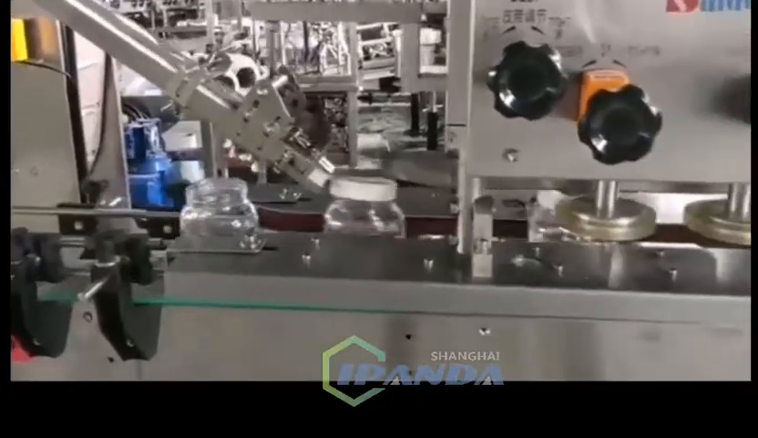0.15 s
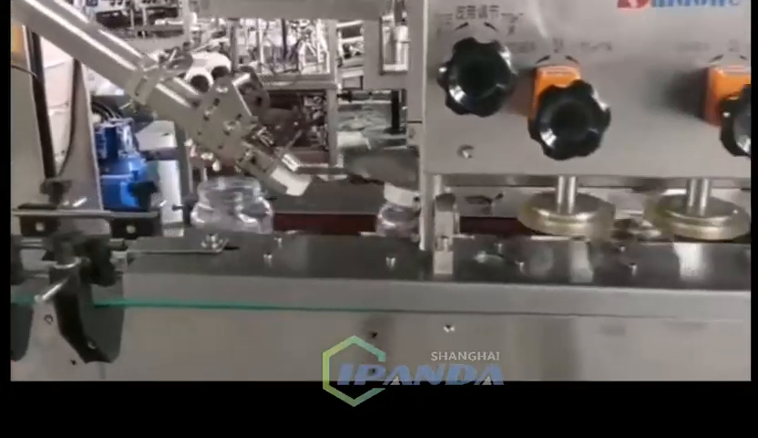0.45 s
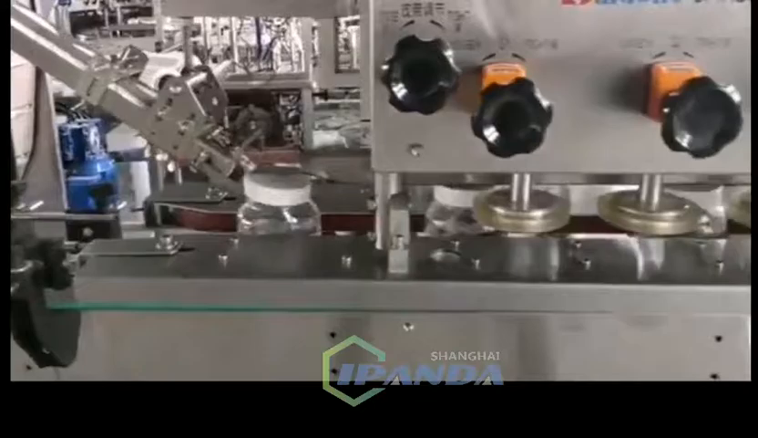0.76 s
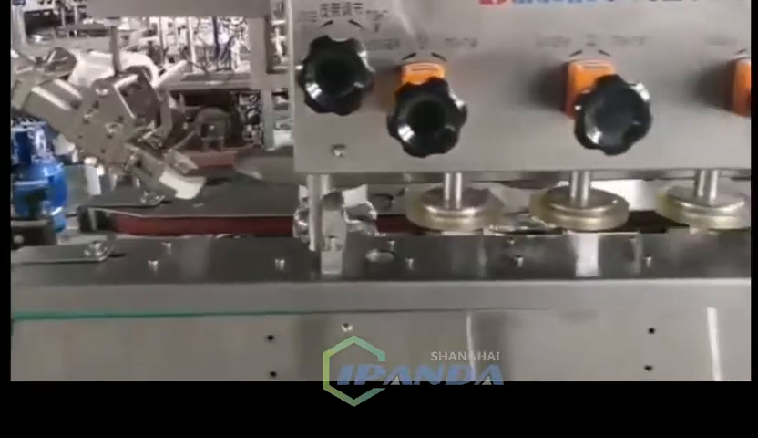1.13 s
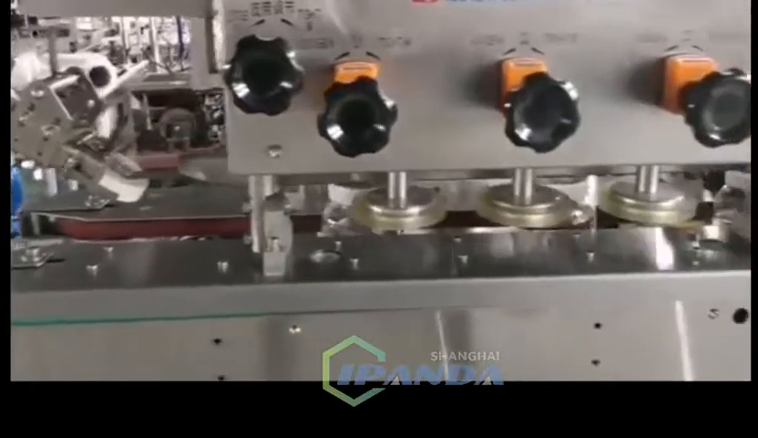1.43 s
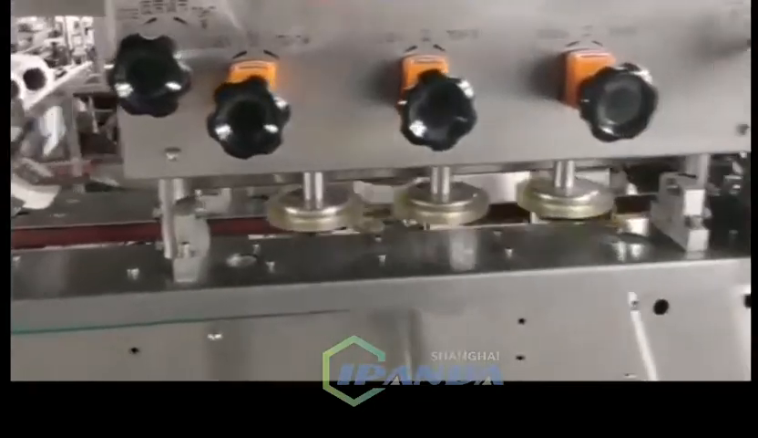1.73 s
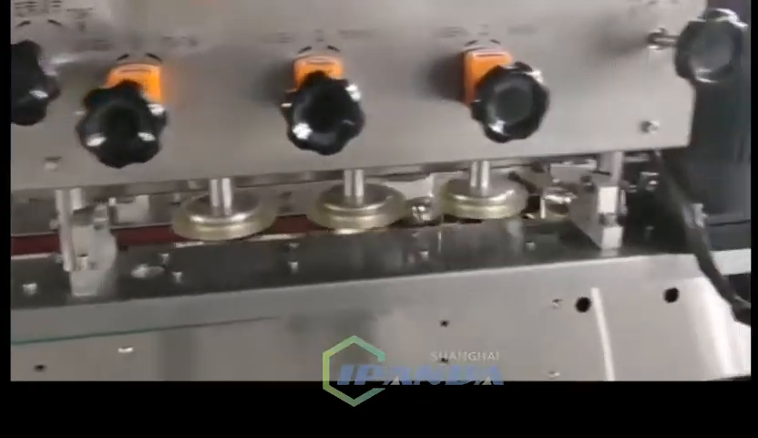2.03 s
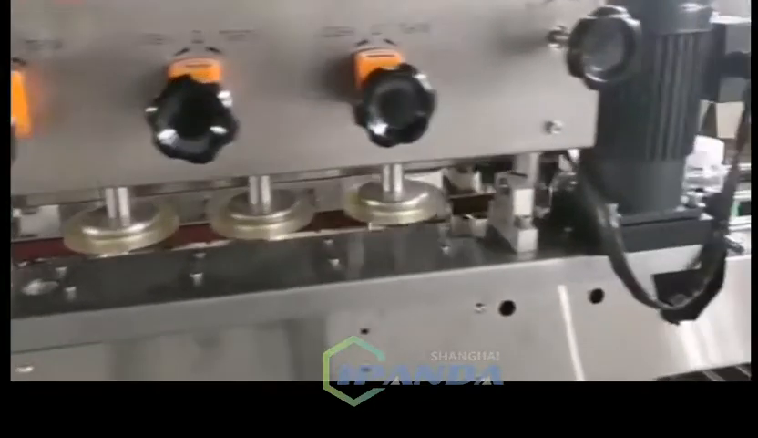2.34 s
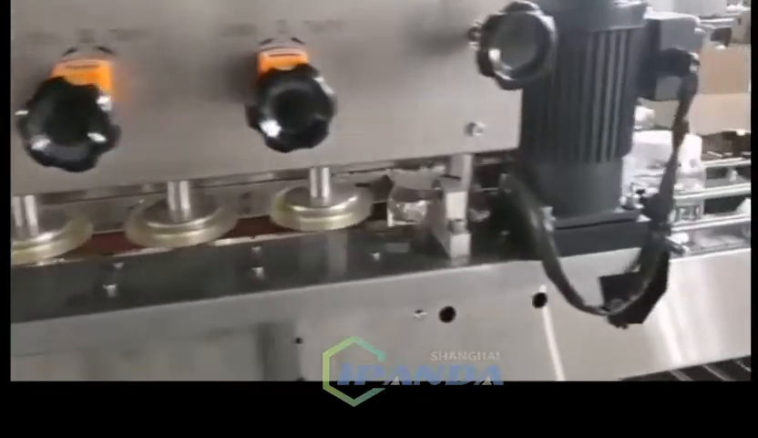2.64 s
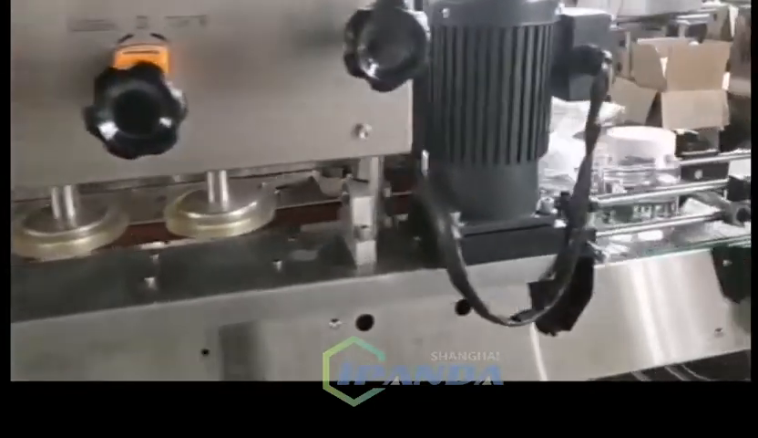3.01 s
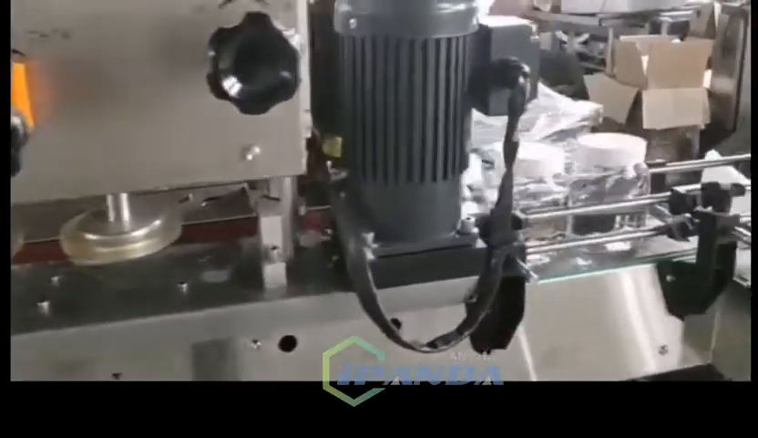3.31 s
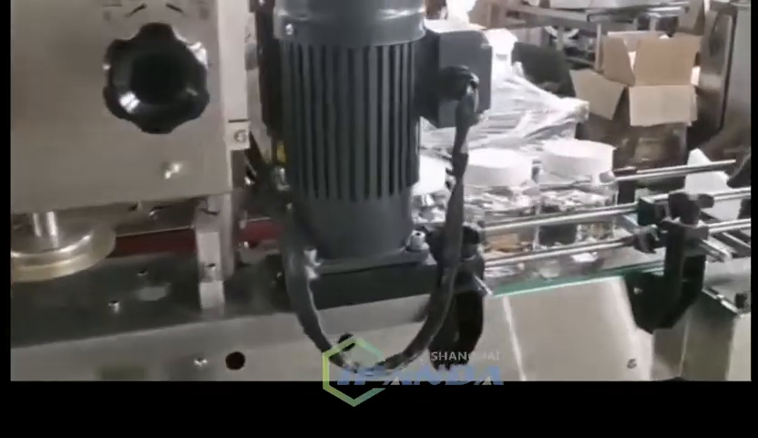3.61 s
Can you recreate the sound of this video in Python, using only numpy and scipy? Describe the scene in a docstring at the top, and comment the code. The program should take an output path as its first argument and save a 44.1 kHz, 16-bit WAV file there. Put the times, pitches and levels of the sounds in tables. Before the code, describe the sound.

Steady whirring and humming comes from a nearby jar capping line in a slightly echoing factory. Quick lid clacks come first, then scattered knocks, a louder clack with a brief metallic ring, and finally a few jar clinks.

```python
"""A capping line runs in a factory hall, heard through a phone that walks along it. Belts and fans whir
as broadband noise, and the meshing teeth of two gearboxes whine in turn. Caps clack onto jars in bursts
of tiny contacts. Blows excite damped modes: lids knock, a guide rail and a steel bar ring, the frame
thuds and full jars clink. The hall answers each blow with diffuse reverberation."""
import sys
import numpy as np
from scipy import signal
from scipy.fft import rfft, irfft, next_fast_len
from scipy.io import wavfile
from scipy.ndimage import uniform_filter1d

SR = 44100
rng = np.random.default_rng(int(sys.argv[2]) if len(sys.argv) > 2 else 0)


def master_out(mix):
    """Clip the mix to full scale and print it as 16-bit PCM to the path in sys.argv[1]."""
    frames = np.transpose(np.atleast_2d(mix))
    ceiling = np.clip(frames, -1, 1)
    pcm = np.round(ceiling * 32767).astype(np.int16)
    wavfile.write(sys.argv[1], SR, pcm)


N = 165816
HARD_CONTACT_S, MEDIUM_CONTACT_S, SOFT_CONTACT_S = 0.00085, 0.005, 0.011


def amp(db):
    """Decibels to amplitude ratio."""
    return 10 ** (np.asarray(db) / 20)


def unit(x):
    """Normalisation to rms 1."""
    return x / np.sqrt(np.mean(x ** 2))


def on_hz(table, size):
    """Interpolation of (Hz, value) rows over log frequency, at the bins of a spectrum."""
    hz, value = np.array(table, float).T
    return np.interp(np.log(np.fft.rfftfreq(size, 1 / SR) + 1), np.log(hz), value)


def on_time(table):
    """Interpolation of (seconds, values..) rows: one curve for each value column."""
    times, *columns = np.array(table).T
    return [np.interp(np.arange(N) / SR, times, column) for column in columns]


def wander(rate_hz, size):
    """Random modulation of rms 1: Gaussian values joined by ramps."""
    step = max(int(SR / rate_hz), 2)
    held = np.repeat(rng.standard_normal(size // step + 1), step)
    return unit(uniform_filter1d(held, step)[:size])


def add(out, x, start_s):
    """Superposition of x on out from start_s."""
    i = int(start_s * SR)
    out[i:i + len(x)] += x[:N - i]


def whir():
    """Broadband noise of belts and fans: two incoherent signals whose third-octave bands flicker."""
    # Each row: frequency in Hz, relative spectral density in dB.
    spectrum = [(28, -20), (50, -8.5), (200, -6.5), (300, -11), (550, -10), (800, -10.5), (1200, -12.5),
                (2700, -10.5), (4500, -15.5), (6500, -12.5), (7700, -19)]
    # Each row: time in seconds, level in dB, middle and bass against the treble in dB.
    levels = [(0, -38.5, 0.1, -1), (.3, -36, 0, 1), (1.1, -35, 0.83, 0.51), (2.0, -35, 0, -0.73),
              (2.75, -34, 1, -1.8), (3.1, -35.5, 0, -1.5), (3.76, -34, 0, -1.7)]
    level_db, middle_db, bass_db = on_time(levels)
    size = next_fast_len(N)
    octave = np.log2(np.fft.rfftfreq(size, 1 / SR) + 1)
    ripple_db = 2.5 * wander(SR / 90, len(octave)) * (octave > np.log2(900))  # uneven above 900 Hz
    gritty = rng.standard_normal((2, size)) * amp(wander(300, size))
    noise = rfft(gritty) * amp(on_hz(spectrum, size) + ripple_db)
    out = np.zeros((2, N))
    for centre in np.arange(4, 13.4, 1 / 3):  # octaves above 1 Hz
        band = np.cos(np.pi * np.clip(1.5 * (octave - centre), -.5, .5)) ** 2
        band_db = bass_db if centre < 8.7 else middle_db if centre < 11.6 else 0
        flicker_db = 1.3 * wander(14, N)
        out += irfft(noise * band, size)[:, :N] * amp(band_db + flicker_db)
    swell_db = .4 * wander(6.6, N)
    return unit(out) * amp(level_db + swell_db)


def gearboxes():
    """Tooth-mesh tones of two gearboxes, each broadened into a narrow band by random modulation."""
    # Each row: frequency in Hz, width in Hz, relative level in dB, roughness from 0 to 1.
    first, second = [(499, 22, 0, .4), (1008, 35, -12, .9), (3192, 20, -12, .8)], [(670, 30, 0.85, 0.92), (699, 30, -0.75, 0.82)]
    # The walk past them. Each row: time in seconds, first and second gearbox's level in dB.
    passing = [(0, -41.5, -78), (.7, -37.5, -59), (1.4, -41, -68), (2.1, -51, -59.5), (2.6, -47, -49.5),
               (3.76, -62, -50)]
    out, t = np.zeros(N), np.arange(N) / SR
    for tones, level_db in zip((first, second), on_time(passing)):
        for hz, width_hz, tone_db, rough in tones:
            smear = (wander(width_hz, N) + 1j * wander(width_hz, N)) / np.sqrt(2)
            tone = np.imag((1 - rough + rough * smear) * np.exp(2j * np.pi * hz * t))
            out += amp(level_db + tone_db) * np.sqrt(2) * tone
    return out


def clacks():
    """Impact noise of caps on jars: many tiny contacts merge into a burst with one spectral hump."""
    # Each row: start in seconds, level in dB, centre in Hz, width in octaves,
    # then rise, hold and 60 dB decay time in seconds.
    bursts = [(0.145, -26.5, 4820, 1.3, 0.004, 0.014, 0.12), (0.182, -29, 3540, 3.6, .003, 0.054, 0.45),
              (0.212, -19.5, 6600, 0.33, 0.0087, 0.02, 0.051), (0.293, -26.5, 4030, 3.6, 0.006, 0.039, 0.1),
              (0.655, -24.5, 3970, 0.31, 0.0087, 0.042, 0.14),
              (0.709, -21.5, 3570, 6.9, 0.01, 0.017, 0.066),
              (0.792, -18.5, 4730, 1.3, 0.0033, 0.0053, 0.068), (0.8, -21.5, 4480, 1.6, .002, .02, .12),
              (0.852, -17.5, 6530, 1.4, 0.003, 0.023, 0.043),
              (1.024, -32.5, 3780, 0.87, 0.01, 0.031, 0.085), (1.362, -26, 3400, 4.2, 0.0083, 0.016, 0.055),
              (1.708, -23, 4060, 5.8, 0.0086, 0.024, 0.14), (2.3781, -10, 4500, 2.6, 0.00026, .0012, 0.014),
              (2.381, -18.5, 3940, 7.9, 0.0022, 0.008, 0.14),
              (2.425, -17.5, 2940, 1.24, 0.0063, 0.028, 0.1), (3.287, -21, 5970, 1, 0.0062, 0.025, 0.041),
              (3.307, -23.5, 4320, 0.77, 0.0023, 0.021, 0.1), (3.413, -17, 3680, 1.2, 0.0014, 0.02, 0.035),
              (3.539, -29, 3480, 0.83, 0.0037, 0.0069, 0.17),
              (3.602, -33.5, 5000, 5.8, 0.0016, 0.0081, 0.049)]
    out, size = np.zeros(N), 16384
    t = np.arange(size) / SR
    octave = np.log2(np.fft.rfftfreq(size, 1 / SR) + 1)
    skirt = 0.22 * (octave > 8)  # flat floor above the bass
    for start_s, db, hz, width, rise, hold, t60 in bursts:
        rattle = rng.standard_normal(size) * amp(3 * wander(400, size))
        hump = 1 / (1 + (2 * (octave - np.log2(hz)) / width) ** 2)
        patchy_db = 3.5 * wander(SR / 60, len(octave))
        burst = unit(irfft(rfft(rattle) * (skirt + hump) * amp(patchy_db)))
        attack = np.minimum(t / rise, 1) ** 2
        decay_db = -60 * np.maximum(t - rise - hold, 0) / t60
        add(out, burst * attack * amp(db + decay_db), start_s)
    return out


def ring(modes, hits, contact_s, free_s=np.inf):
    """Modal superposition: each blow excites decaying sines; after free_s the belts grip and damp them."""
    # Each row of modes: frequency in Hz, relative level in dB, 60 dB decay time in seconds.
    # Each row of hits: start in seconds, level in dB, decay time ratio, optional pitch ratio.
    hz, mode_db, t60 = np.array(modes).T[:, :, None]
    out, t = np.zeros(N), np.arange(SR // 2) / SR
    attack = np.minimum(t / contact_s, 1)
    grip_db = -60 * np.maximum(t - free_s, 0) / .1
    for start_s, db, decay_ratio, *pitch in hits:
        detune, phase, mix = rng.standard_normal((3, len(modes), 1))
        waves = np.sin(2 * np.pi * (hz * np.prod(pitch) * (1 + .001 * detune) * t + phase))
        wobble_db = 2 * np.array([wander(45, len(t)) for _ in modes]) * (hz > 1000)
        decay_db = grip_db - 60 * t / (t60 * decay_ratio)
        waves *= amp(mode_db + 1.5 * mix + wobble_db + decay_db)
        add(out, amp(db) * waves.sum(axis=0) * attack, start_s)
    return out


def lids():
    """Heavily damped midrange modes make a struck lid knock."""
    modes, hits = [(578, -1.5, .11), (640, -2.5, .13), (700, -4.5, .13), (503, -7, .09), (431, -8, .09)], [(.177, -26, 0.75, 1.04), (.195, -29.5, 1.1, 1.01), (.756, -27, 0.7, 1.08),
                                (.79, -25, 1.2, 1.03), (.843, -30, 0.37, 1.1), (1.03, -34, 1.5, 1.1),
                                (1.377, -38, 0.95, 1), (2.380, -22.5, 0.77, 0.87), (2.437, -20, 0.87, 1.15),
                                (3.414, -26, 0.64, 1.7)]  # rows as in ring()
    return ring(modes, hits, HARD_CONTACT_S)


def guide_rail():
    """Closely spaced high modes give the struck rail a brief metallic ring."""
    modes, hits = [(3826, 6, .15), (3590, -3, .1), (4075, -6, .12), (5865, -6, .16), (3080, -8, .2),
                   (4530, -8, .1), (3380, -6, .12)], [(0.304, -20, 0.45), (0.672, -23, 0.5), (1.032, -29, 0.63),
                                 (1.631, -27.5, 1.02), (2.439, -23.5, 1.27)]  # rows as in ring()
    return ring(modes, hits, MEDIUM_CONTACT_S)


def frame():
    """Low modes, excited through a soft contact, make the frame thud."""
    modes, hits = [(199.7, 2.5, 0.36), (224.7, 2, 0.28), (168.5, -7.5, 0.21), (310, -6, 0.32),
                   (432, -2, 0.17)], [(0.32, -38, 0.89, 0.97), (.679, -31, 1.13, 1.02),
                                  (0.727, -26.5, 0.95, 1.05), (0.822, -35.5, 0.65, .99),
                                  (1.032, -33.5, 0.63, 0.89), (1.384, -36.5, 0.73, 0.93),
                                  (1.647, -39.5, 0.63, 1.1), (1.692, -33, 0.69, 1.02),
                                  (1.771, -34.5, 0.51, 1.25), (2.058, -33.5, 0.59, 1.07),
                                  (2.37, -34.5, 1.14, 0.96), (2.446, -26.5, 0.65, 1.06),
                                  (2.495, -30, 0.68, 1)]  # rows as in ring()
    return ring(modes, hits, SOFT_CONTACT_S)


def steel_bar():
    """Two neighbouring modes of the struck bar beat until the belts damp them."""
    modes, hits = [(2378, 0, .8), (2410, -3, .8), (1908, 2, .13)], [(.716, -33, .2, 1.02), (1.372, -32, .2, 1.045), (2.383, -24, 1., 1.),
                                (2.437, -29, .8, 1.)]  # rows as in ring()
    return ring(modes, hits, HARD_CONTACT_S, free_s=.21)


def jars():
    """Wall modes of full jars clink: a lower jar decays freely, a higher one is damped by the belts."""
    low_modes, low_hits = [(2888, 1, .3), (2945, -4, .25), (4264, 2, .14), (3680, 0, .08), (5830, -4, .2),
                           (6735, -7, .08)], [(3.204, -36, .8), (3.24, -38, .6), (3.413, -23, .7),
                                            (3.458, -29, .9), (3.548, -32, .7), (3.608, -32, .7)]  # rows as in ring()
    high_modes, high_hits = [(3074, -2, .7), (4021, -6, .5), (4180, -8, .15), (4410, 0, .14),
                             (4570, -8, .1), (5916, 5, .22), (5730, 1, .08), (6100, -2, .08),
                             (2498, -7, .1)], [(3.293, -19, .4, .98), (3.309, -21.5, 1, 1)]
    low = ring(low_modes, low_hits, HARD_CONTACT_S)
    return low + ring(high_modes, high_hits, MEDIUM_CONTACT_S, free_s=.065)


def hall(x, db=-11, t60=0.85, top_hz=3900):
    """Diffuse reverberation: convolution with an exponentially decaying cloud of reflections."""
    t = np.arange(int(t60 * SR)) / SR
    cloud = signal.lfilter(*signal.butter(1, top_hz, fs=SR), rng.standard_normal(len(t)))
    cloud *= amp(-60 * t / t60)
    return amp(db) * signal.fftconvolve(x, cloud / np.linalg.norm(cloud))[:N]


def scatter(x):
    """All-pass dispersion: random group delays of a few milliseconds shift phase and keep colour."""
    size = next_fast_len(N)
    delay_s = .004 * np.abs(wander(SR / 400, size // 2 + 1))
    phase = 2 * np.pi * np.cumsum(delay_s) * SR / size
    return irfft(rfft(x, size) * np.exp(-1j * phase), size)[:N]


def ports(first, second, gain_db=-1.5):
    """Partial coherence: bass is nearly alike in both microphone ports;
    higher up, the right is later, dimmer and less alike."""
    # Each row: frequency in Hz, likeness of the ports from 0 to 1.
    likeness = [(60, .98), (300, .96), (600, .86), (1100, .5), (2200, .2)]
    # Each row: frequency in Hz, left minus right level in dB.
    balance = [(60, .4), (600, 0.58), (1580, 3), (2730, 5.7), (4710, 11.5), (8130, 16.5)]
    # Each row: frequency in Hz, phase lead of the left port in radians.
    phase_lead = [(220, 0), (520, .5), (700, .85), (1380, 3.2), (8000, 14)]
    size = next_fast_len(N)
    coherence = np.clip(on_hz(likeness, size), 0, 1)
    tilt = amp(on_hz(balance, size))
    lag = np.exp(-1j * on_hz(phase_lead, size))
    left, unrelated = rfft(first, size), rfft(second, size)
    right = (coherence * lag * left + np.sqrt(1 - coherence ** 2) * unrelated) / tilt
    equal_power = 2 / np.sqrt(1 + tilt ** -2.)
    return irfft(np.array([left, right]) * equal_power * amp(gain_db), size)[:, :N]


def scene():
    """Direct sound, reverberation of the blows and whir superpose at the phone's two ports."""
    blows = clacks() + lids() + guide_rail() + frame() + steel_bar() + jars()
    direct = blows + gearboxes()
    noise = whir()
    return ports(direct + hall(blows) + noise[0], scatter(direct) + hall(blows) + noise[1])


def record(dry, top_hz=7720):
    """Soft limiting rounds the loudest peaks, and a steep low-pass cuts the top."""
    low_pass = signal.ellip(12, .1, 60, top_hz, fs=SR, output="sos")
    return signal.sosfilt(low_pass, np.tanh(dry))


dry = scene()
out = record(dry)
master_out(out)
```